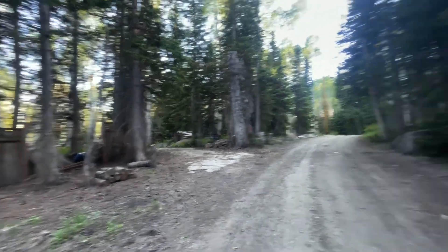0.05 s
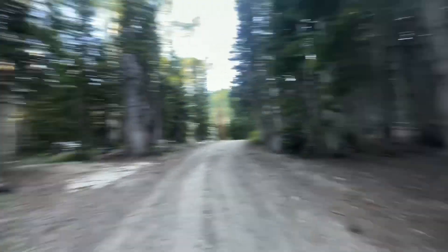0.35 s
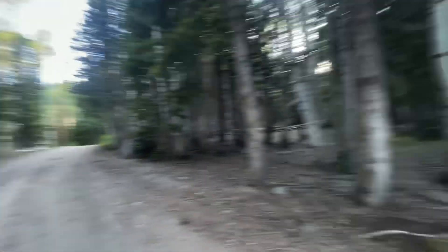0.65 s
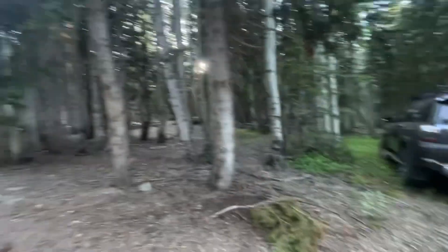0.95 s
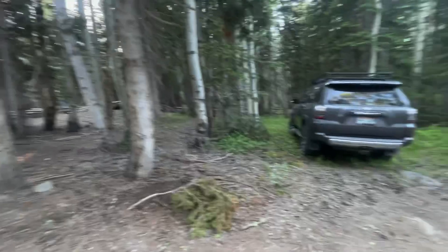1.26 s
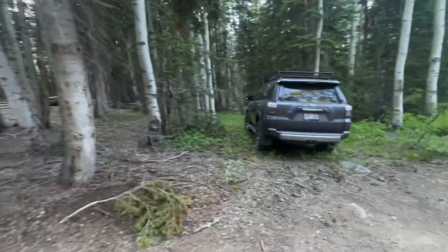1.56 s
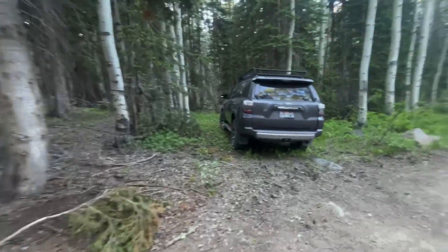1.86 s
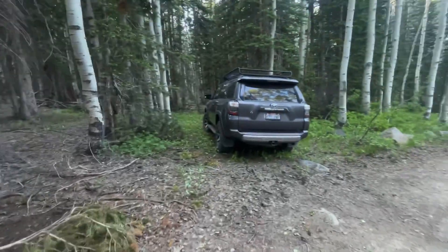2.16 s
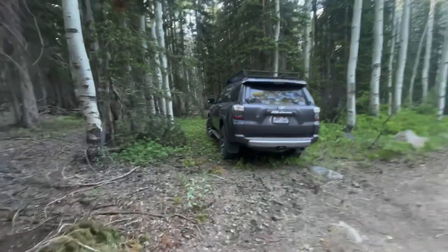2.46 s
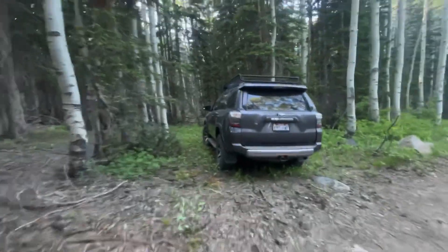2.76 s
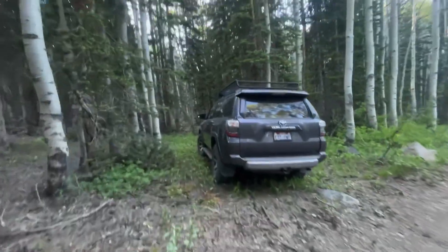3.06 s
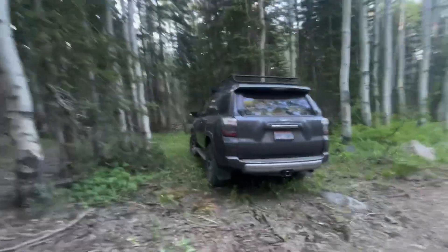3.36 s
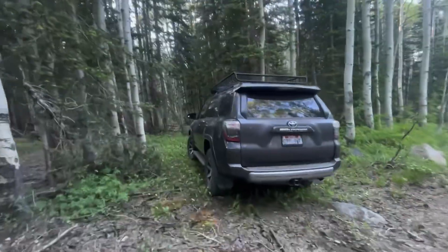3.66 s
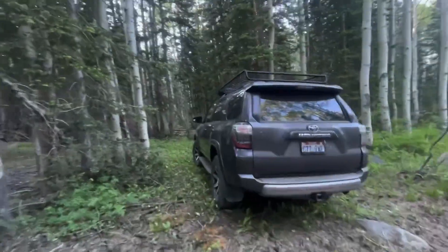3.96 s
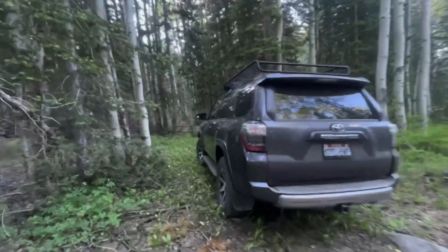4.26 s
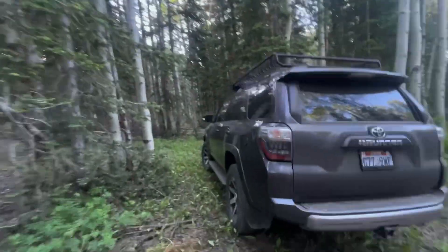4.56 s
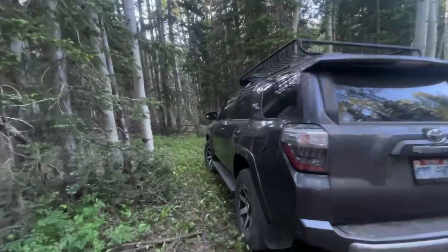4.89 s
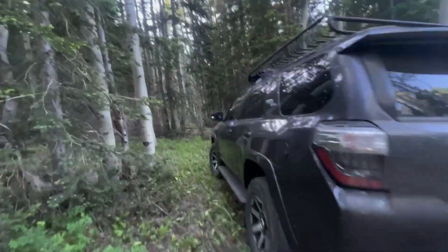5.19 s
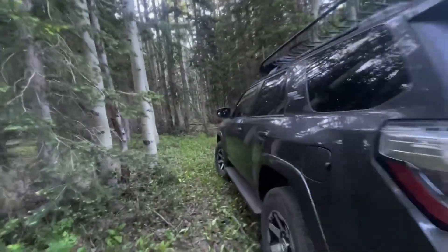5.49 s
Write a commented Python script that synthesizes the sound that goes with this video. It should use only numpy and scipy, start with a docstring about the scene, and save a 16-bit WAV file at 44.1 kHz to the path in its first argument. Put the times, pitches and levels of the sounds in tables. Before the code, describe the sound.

In a quiet forest, a person walks from a dirt road onto dry litter, heard close from a hand-held microphone that gets bumped a few times near the start. Each step brings a soft, gritty crunch with clicking stones and the odd breaking twig. A trouser leg swishes lightly and a far bird whistles very faintly. Toward the end the feet brush through undergrowth, and sharp snaps and crackling leaves crowd together.

```python
"""A still woodland, on a walk from a dirt road over forest litter into dry undergrowth, heard from the
two microphones of a small hand-held camera. The air rumbles low and a far bird whistles faintly.
Close by, each step grinds soil, twigs and dead leaves as a swarm of tiny fractures; pebbles clack,
twigs snap, heels thud and a trouser leg swishes. Right at the microphones the hand bumps the camera,
several times early on and once near the end."""
import sys
import numpy as np
from scipy import signal
from scipy.io import wavfile

SR = 44100
rng = np.random.default_rng(int(sys.argv[2]) if len(sys.argv) > 2 else 0)


def dump_mix(stems):
    """Bounce the given channels to the path in sys.argv[1] as a 16-bit WAV at rate SR."""
    frames = np.atleast_2d(stems).T  # one column per channel
    limited = np.clip(frames, -1, 1)  # hard clip at full scale
    pcm = np.round(limited * 32767).astype(np.int16)
    wavfile.write(sys.argv[1], SR, pcm)


N = 243873
TIME = np.arange(N) / SR

# How alike the two microphones hear noise. Each row: frequency in Hz, left-right correlation.
MIC_CORRELATION = [(60, 0.22), (300, 0.46), (900, 0.75), (1800, 0.24), (3000, 0.22), (7000, 0.24)]
# Lean between the microphones, for noise and for snaps. Each row: frequency in Hz, left over right in dB.
MIC_BALANCE = [(700, 0.5), (2500, -.5), (4500, 1.5), (7000, 5.5), (9000, 10), (11000, -0.5)]
SNAP_BALANCE = [(3000, 1), (6200, 2), (7300, 3), (8400, 12), (10300, 4)]
# Colours of the air all around and of the ground below the camera.
# Each row: frequency in Hz, relative spectral density in dB.
AIR_COLOUR = [(25, -19), (45, -0.5), (65, 9), (100, -5), (200, -35), (400, -16), (1000, -35)]
EARTH_COLOUR = [(75, -3.5), (250, -1.5), (520, -1)]
HUMUS_COLOUR = [(360, -20), (580, 1), (900, -1)]
SOIL_COLOUR = [(240, -17), (380, -17.5), (550, -1.5), (850, 3), (1300, 2.5), (1900, -12.5), (2600, -19)]
TWIG_COLOUR = [(1400, -2), (2100, -4), (2900, -1), (3700, -3.5), (4600, -7.5), (6000, -14)]
LEAF_COLOUR = [(3800, -12), (5000, -8), (6300, -2.5), (8000, -2.5), (9800, -3), (11500, -1.5), (12800, -9),
               (14500, -28)]
# The low rumble of the air. Each row: time in seconds, level in dB.
AIR_LEVELS = [(1, -72.5), (1.3, -76), (2.1, -80), (2.4, -76), (3.6, -74.5)]
# A bird far off in the trees. Each row: middle in seconds, length in seconds, pitch in Hz, level in dB.
BIRD_WHISTLES = [(2.496, 0.12, 5400, -62.5), (3.678, 0.35, 4100, -68.5)]
# A trouser leg passing close by. Each row: middle in seconds, length in seconds, level in dB.
SWISHES = [(1.389, 0.44, -70)]
# The cloth's hollow colour. Each row: centre in Hz, width in Hz, gain in dB.
SWISH_MODES = [(3220, 510, -3.5), (5900, 520, -0.5), (8300, 730, -6)]
# The camera case ringing. Each row: pitch in Hz, level in dB, left over right in dB.
CASE_MODES = [(1980, -39.5, -4), (3660, -54.5, -4), (6500, -42.5, -1), (8750, -30.5, -21)]
# The hand bumping the camera. Each row: time in seconds, level in dB, pitch in Hz,
# left over right in dB, fall of pitch per cycle, cycles to the peak.
HAND_BUMPS = [(0.674, -26, 810, 3.5, 0.2, 1.23), (0.7082, -31, 564, 5, .03, 1.4),
              (0.7475, -20, 676, 1.5, .38, 1.17), (.773, -24.5, 512, 9, 0.8, 1.28),
              (0.8131, -25.5, 704, 8, .21, 1.32), (4.8908, -26, 887, 11, 0.016, 2.25)]
# Weight landing on soft ground. Each row: time in seconds, level in dB, pitch in Hz.
HEEL_THUDS = [(1.567, -46.5, 208), (1.593, -49, 68.4), (1.807, -56.5, 187), (2.012, -57.5, 84.5),
              (2.612, -46.5, 266), (3.202, -47, 230)]
# Pebbles knocked together underfoot. Each row: time in seconds, level in dB, pitch in Hz.
PEBBLE_CLACKS = [(.0282, -44, 850), (.065, -42, 990), (0.0817, -46, 1030), (0.3994, -43.5, 1150),
                 (.412, -44, 1100), (0.4684, -43.5, 860), (0.9667, -42, 1050), (.9798, -39.5, 1120),
                 (1.0273, -39.5, 1150), (1.1354, -48, 1480), (1.2478, -44, 1250), (1.397, -46.5, 1120),
                 (1.558, -30.5, 895), (1.7856, -36, 1080), (1.7957, -35.5, 1330), (1.84, -38, 1280),
                 (1.8835, -42, 960), (1.9025, -36, 1510), (1.941, -48.5, 1500), (2.0532, -48, 900),
                 (2.1083, -49, 920), (2.1606, -52.5, 1030), (2.5166, -41.5, 1120), (2.535, -36.5, 1020),
                 (2.5435, -41, 920), (2.5577, -39.5, 1200), (2.777, -50.5, 860), (2.8525, -45, 1000),
                 (2.876, -43.5, 853), (2.9335, -44, 800), (3.1796, -47.5, 1300), (3.2036, -40, 980),
                 (3.2408, -39, 950), (3.2504, -41.5, 1250), (3.524, -40.5, 960), (3.7258, -47.5, 1410),
                 (3.791, -47.5, 1400), (3.8256, -44.5, 770), (3.944, -43, 686), (4.1629, -43, 740),
                 (4.224, -45.5, 881), (4.7933, -38.5, 1520), (5.2339, -31.5, 970), (5.462, -41, 1520)]
# Twigs snapping. Each row: time in seconds, level in dB, pitch in Hz, share of clean ring from 0 to 1.
TWIG_SNAPS = [(.3988, -47, 8550, .94), (0.6732, -45.5, 2400, 0.7), (0.937, -41, 7500, 0.6),
              (1.2258, -48, 2810, 0.1), (1.559, -34, 7900, 0.5), (1.583, -46, 3350, 0.7),
              (1.5924, -46.5, 2730, 0.7), (1.775, -40.5, 2800, 0.3), (1.796, -34.5, 2630, 0.53),
              (1.802, -37.5, 2720, 0.6), (1.9973, -34.5, 8200, 0.62), (2.35, -52, 2800, 0.56),
              (2.5858, -39.5, 2940, 0.36), (2.6394, -25, 8440, 0.94), (3.16, -45, 3080, 0),
              (3.1794, -35.5, 3830, .75), (3.196, -35, 5700, 0.06), (3.8189, -36, 7500, 0.13),
              (3.858, -46, 3160, 0), (4.176, -42, 6000, 0.2), (4.271, -36.5, 6500, 0.02),
              (4.3256, -33, 9000, .6), (4.3431, -36.5, 7200, 0.1), (4.3685, -36, 7400, 0),
              (4.452, -32.5, 6350, 0.46), (4.4721, -25, 6500, 0.65), (4.6976, -33, 6350, 0.26),
              (4.723, -31, 6900, 0.53), (4.757, -33.5, 8300, 0.7), (4.7931, -27.5, 3270, 0.44),
              (4.8007, -28, 8450, 0.44), (4.838, -34, 8800, .2), (4.8555, -26, 8600, 0.62),
              (4.944, -35, 3770, 0.2), (4.9991, -22, 8560, 0.7), (5.0137, -19, 8100, 0.74),
              (5.0253, -29.5, 7300, 0.4), (5.068, -21.5, 8300, 0.64), (5.118, -20.5, 6250, 0.3),
              (5.178, -28, 3300, 0.1), (5.2337, -19, 6000, .85), (5.2555, -22.5, 6170, 0.73),
              (5.3537, -30, 6170, 0.62)]
# The ring of a snap. Each row: multiple of the snap's pitch, gain in dB.
SNAP_MODES = [(.8, -16), (1, 1.5), (1.2, -20)]
# The path gives way to undergrowth on deep humus. Each row: time in seconds, its share from 0 to 1.
UNDERGROWTH = [(4.24, 0.07), (4.28, 0.68), (4.5, 0.39)]
# A faint rustle that never stops. Each row: time in seconds, then soil, twig and leaf drive in dB.
RUSTLE = [(0, -62.5, -70, -76), (.63, -74.5, -72, -72.5), (1.52, -69, -64.5, -64), (2.18, -71, -70, -69),
          (2.97, -68.5, -65, -66), (3.66, -69, -69, -66), (5.52, -65.5, -57.5, -55.5)]
# The swinging foot brushing through the litter.
# Each row: middle in seconds, half length in seconds, drive in dB, leaves over soil in dB.
BRUSHES = [(1.355, 0.14, -66.0, -4), (1.976, 0.048, -67, 9), (2.526, 0.21, -65, 2.5),
           (2.88, 0.069, -63.5, -2), (3.518, 0.093, -68, -10), (3.76, 0.068, -65, 3),
           (3.974, 0.15, -55.5, -4.5), (4.047, 0.039, -58.5, -0.5), (4.382, 0.058, -58.5, 4.5),
           (4.476, 0.035, -50, 1), (4.588, 0.051, -50.5, -4), (4.908, 0.22, -53, 1.5),
           (5.328, 0.068, -56.5, 12), (5.487, 0.0343, -57.5, 10)]
# A shoe pressing on the ground. Each row: end of the attack in seconds, hold in seconds,
# release to -60 dB in seconds, then soil, twig and leaf drive in dB.
STEPS = [(0.077, 0.038, 0.34, -53, -67.5, -72), (0.205, 0.012, 0.09, -53.0, -72, -77),
         (0.284, 0.21, 0.3, -59.5, -67, -73.5), (0.391, 0.013, 0.25, -56.0, -62, -64),
         (0.669, 0.15, 0.72, -59.5, -75, -66.5), (0.938, 0.057, 0.46, -56, -68, -68.5),
         (1.557, 0.028, 0.04, -50.5, -62, -57), (1.785, 0.012, 0.76, -51, -58, -62),
         (1.823, 0.061, 0.62, -50, -55, -60.5), (2.546, 0.06, 0.55, -52, -56.5, -57.5),
         (2.918, 0.013, 0.16, -50.5, -54.5, -59), (3.159, 0.06, 0.85, -51, -57.5, -55),
         (3.308, 0.036, 0.3, -58.5, -64.5, -64.0), (4.199, 0.011, 0.24, -53.5, -58, -61),
         (4.492, 0.032, 0.26, -52, -42, -37.5), (4.701, 0.015, 0.5, -51, -64, -51),
         (5.114, 0.03, 0.66, -39, -37.5, -36), (5.199, 0.051, 0.33, -45, -41.5, -36.5)]

CASE_CLICK_S, CASE_RISE_CYCLES = .7453, 3.1
SNAP_RISE_S, SPLINTER_S = .0007, .0034   # a snap swells to its peak, then the fibres tear on
STEM_RING_CYCLES, STEM_RANGE_HZ = 5.6, (2470, 11230)
STEP_ATTACK_S, SAG_DB_PER_S = .027, 10   # the crunch eases while the weight settles
LEFT_LAG_S = .00004   # the steps reach the right microphone a little sooner


def from_db(db):
    """Decibels to gain."""
    return 10 ** (np.asarray(db) / 20)


def rms_one(x):
    """Scale to unit rms."""
    return x / np.sqrt(np.mean(x ** 2) + 1e-20)


def in_time(rows):
    """Columns of a curve table at every sample."""
    s, *columns = np.transpose(rows)
    return [np.interp(TIME, s, c) for c in columns]


def at_hz(points, hz):
    """Read a table on a log-frequency axis."""
    f, value = np.transpose(points)
    return np.interp(np.log(hz), np.log(f), value)


def band(x, low_hz, high_hz, order=2):
    """Butterworth band-pass."""
    sos = signal.butter(order, [low_hz, min(high_hz, .48 * SR)], "band", fs=SR, output="sos")
    return signal.sosfilt(sos, x + 1e-18)


def below(x, hz):
    """Steep low-pass without delay."""
    return signal.sosfiltfilt(signal.butter(10, hz, fs=SR, output="sos"), x)


def panned(db):
    """Constant-power gains for the two microphones, the left louder by db."""
    return rms_one(from_db([[db / 2], [-db / 2]]))


def add(out, s, sound):
    """Mix a stereo sound in from time s."""
    i = max(0, round(s * SR))
    out[:, i:i + sound.shape[1]] += sound[:, :N - i]


def coloured(colour, drive):
    """Third-octave bands of stereo noise, gated by one drive, each flickering a little; rms 1."""
    edges = 1000 * 2 ** (np.arange(-16, 14) / 3)
    flicker_times = np.arange(0, N / SR, .018)
    white, out = rng.standard_normal((2, 2, N)) * drive, 0
    for k, (low, high) in enumerate(zip(edges, edges[1:])):
        hz = np.sqrt(low * high)
        if colour[0][0] < hz < colour[-1][0]:
            mid, side = band(white[k % 2], low, high)
            alike = at_hz(MIC_CORRELATION, hz)
            pair = np.sqrt(1 + alike) * mid + np.sqrt(1 - alike) * side * [[1], [-1]]
            flicker_db = rng.normal(0, 2.28, len(flicker_times))
            gain = np.interp(TIME, flicker_times, from_db(at_hz(colour, hz) + flicker_db))
            out = out + pair * gain * panned(at_hz(MIC_BALANCE, hz))
    return rms_one(out)


def swell(cycles, rise):
    """Envelope that peaks at 1 after `rise` cycles and dies nearly as fast."""
    return (cycles / rise * np.exp(1 - cycles / rise)) ** 3


def knock(hz, fall, rise, lag, tail_db):
    """A damped ring sinking in pitch, then a scattered tail; lag in radians between the microphones."""
    cycles = TIME[:int(30 * SR / hz)] * hz
    phase = 2 * np.pi * (1 + fall * rise) * np.log1p(fall * cycles) / fall + rng.uniform(0, 2 * np.pi)
    ring = swell(cycles, rise) * np.sin(phase + [[0], [lag]])
    scatter = rms_one(band(rng.standard_normal(SR // 2)[:len(cycles)], hz / 2, hz * 1.1))
    return ring + from_db(tail_db) * scatter * (1 - np.exp(-cycles / rise)) * np.exp(-cycles / 8)


def air():
    """The woodland air rumbles low all around the microphones."""
    return from_db(in_time(AIR_LEVELS)[0]) * coloured(AIR_COLOUR, 1)


def far_bird():
    """Thin, distant whistles, smeared by the trees into narrow bands of noise."""
    out = np.zeros((2, N))
    for s, length, hz, db in BIRD_WHISTLES:
        whistle = rms_one(band(rng.standard_normal((2, SR)), hz * .95, hz * 1.05))
        shape = np.hanning(int(length * SR))
        add(out, s - length / 2, from_db(db) * whistle[:, :len(shape)] * shape)
    return out


def trouser_swish():
    """Just below the camera, cloth rubs softly through three hollow resonances."""
    out = np.zeros((2, N))
    for s, length, db in SWISHES:
        shape = np.hanning(int(length * SR))
        for hz, width, mode_db in SWISH_MODES:
            noise = rng.standard_normal((2, SR))
            mid, side = band(noise, hz - width / 2, hz + width / 2)[:, :len(shape)]
            cloth = panned(at_hz(MIC_BALANCE, hz)) * rms_one(mid + side * [[.5], [-.5]])
            add(out, s - length / 2, from_db(db + mode_db) * cloth * shape)
    return out


def case_click():
    """At the hardest bump the camera case ticks in four short modes, right at the microphones."""
    out, t = np.zeros((2, N)), TIME[:SR // 25]
    for hz, db, pan_db in CASE_MODES:
        ring = swell(t * hz, CASE_RISE_CYCLES) * np.sin(2 * np.pi * hz * t)
        add(out, CASE_CLICK_S - CASE_RISE_CYCLES / hz, from_db(db) * panned(pan_db) * ring)
    return out


def hand_bumps():
    """Knocks through the camera body rock its two microphones nearly in opposition."""
    out = np.zeros((2, N))
    for s, db, hz, pan_db, fall, rise in HAND_BUMPS:
        gain = from_db(db) * panned(pan_db)
        add(out, s - rise / hz, gain * knock(hz, fall, rise, lag=2.36, tail_db=-20))
        grip = fall * gain   # the grip swings on, lower and later
        add(out, s, grip * from_db(-2.5) * knock(266, fall=.33, rise=.94, lag=2.47, tail_db=-29))
        add(out, s, grip * from_db(-11.5) * knock(78, fall=.095, rise=.71, lag=2, tail_db=-18))
    return out


def heel_thuds(rise=1.7):
    """The springy forest floor gives a few low cycles under a heel."""
    out = np.zeros((2, N))
    for s, db, hz in HEEL_THUDS:
        add(out, s - rise / hz, from_db(db) * knock(hz, fall=.025, rise=rise, lag=.67, tail_db=-13.5))
    return out


def pebbles(rise=1.188):
    """Stones bedded in earth ring for only two or three cycles, with a gritty tick at the contact."""
    out = np.zeros((2, N))
    for s, db, hz in PEBBLE_CLACKS:
        clack = knock(hz, fall=.13, rise=rise, lag=0, tail_db=-13)
        grit = rms_one(band(rng.standard_normal(SR // 10), 1400, 3100))[:clack.shape[1]]
        tick = grit * swell(TIME[:len(grit)] * hz, rise)
        add(out, s - rise / hz, from_db(db) * (clack + from_db(-17.5) * tick))
    return out


def twig_snaps():
    """A thin twig parts with a brief ring of three modes, a rotten one with a broad, splintering crack."""
    out, t = np.zeros((2, N)), TIME[:SR // 25]
    splintering = np.exp(-t / SPLINTER_S) * np.minimum(t / SNAP_RISE_S, 1)
    for s, db, hz, clean in TWIG_SNAPS:
        rise = max(SNAP_RISE_S * hz, 3.2)   # cycles
        burst, ring = swell(t * hz, rise), 0
        for ratio, mode_db in SNAP_MODES:
            gain = from_db(mode_db + rng.normal(0, 1)) * panned(at_hz(SNAP_BALANCE, hz * ratio))
            phase = 2 * np.pi * (hz * ratio * t + rng.random()) + rng.uniform(0, 1, (2, 1))
            ring = ring + gain * burst * np.sin(phase)
        # standing stems crack brighter than trodden twigs
        top_hz = 9000 + 3000 * np.interp(s, *np.transpose(UNDERGROWTH))
        mid, side = band(rng.standard_normal((2, len(t))), hz * .37, min(hz * 1.5, top_hz), order=4)
        noise = panned(at_hz(SNAP_BALANCE, hz)) * rms_one(mid + side * [[.5], [-.5]])
        crack = from_db(-2) * noise * (burst + splintering) / 2
        add(out, s - rise / hz, from_db(db) * (clean * ring + (1 - clean) * crack))
    return out


def stems(per_s):
    """Dry stems of many thicknesses break, each ringing briefly at its own pitch and place; rms 1."""
    pitches = np.geomspace(*STEM_RANGE_HZ, 32)
    per_s = np.maximum(per_s, 100)
    cracks = rng.standard_normal(N) * (rng.random(N) < per_s / SR) / np.sqrt(per_s)
    crack_hz, out = rng.choice(pitches, N), 0
    for hz in pitches:
        radius, angle = np.exp(-hz / (STEM_RING_CYCLES * SR)), 2 * np.pi * hz / SR
        resonator = [1, -2 * radius * np.cos(angle), radius ** 2]
        ring = signal.lfilter([np.sin(angle)], resonator, cracks * (crack_hz == hz) + 1e-18)
        place = panned(at_hz(MIC_BALANCE, hz) + rng.normal(0, 3.7))
        out = out + from_db(at_hz(LEAF_COLOUR, hz)) * place * ring
    return rms_one(out)


def fractures(colour, per_s, spread_db, rub, clump_db):
    """Clumps of cracks, many small and few large; rub is the ratio of rubbing to cracking; rms 1."""
    sizes = from_db(spread_db * np.minimum(rng.exponential(1, N), 3))
    clumps = from_db(clump_db * np.tanh(rms_one(band(rng.standard_normal(N), 12, 107))))
    cracks = rms_one(sizes * clumps * (rng.random(N) < per_s / SR))
    return coloured(colour, np.sqrt((cracks ** 2 + rub ** 2) / (1 + rub ** 2)))


def tread():
    """Feet press and brush: soil, twig and leaf drive in dB, then the brushes' share of soil power."""
    clock = np.linspace(0, N / SR, N // 64)
    power = from_db([np.interp(clock, TIME, db) for db in in_time(RUSTLE)]) ** 2
    for s, hold, release, *levels in STEPS:
        t = clock - s
        attack = np.clip(1 + t / STEP_ATTACK_S, 0, 1) ** 2
        sag_db = SAG_DB_PER_S * (np.clip(t, 0, hold) - hold / 2)
        release_db = 60 * np.clip((t - hold) / release, 0, 2)
        power = power + np.outer(from_db(levels), attack * from_db(-sag_db - release_db)) ** 2
    pressing = power[0]
    for s, half, db, leafy_db in BRUSHES:
        levels = [db - leafy_db / 2, db - .7, db + leafy_db / 2]   # twigs bend more than they break
        sweep = np.exp(-.5 * ((clock - s) / half) ** 4)
        power = power + np.outer(from_db(levels), sweep) ** 2
    return in_time(np.column_stack([clock, *10 * np.log10(power), 1 - pressing / power[0]]))


def crunch():
    """Underfoot, soil grinds low, twigs crackle in the middle, dry leaves fizz and stems ping on top."""
    soil_db, twig_db, leaf_db, dragging = tread()
    lush = in_time(UNDERGROWTH)[0]
    # a light or dragging foot only rubs, a heavy one breaks things
    slide = np.clip(from_db(-(soil_db + 61)), .25, 2) + dragging + .5 * lush
    soil = fractures(SOIL_COLOUR, per_s=300, spread_db=2.5, rub=slide, clump_db=2.5)
    humus = fractures(HUMUS_COLOUR, per_s=360, spread_db=1, rub=1, clump_db=-1.5)
    earth = coloured(EARTH_COLOUR, 1)
    twigs = fractures(TWIG_COLOUR, per_s=800, spread_db=3, rub=slide + .9, clump_db=5.5)
    leaves = fractures(LEAF_COLOUR, per_s=1400, spread_db=1.5, rub=1.4 - lush, clump_db=4)
    # a heavy foot breaks stems in a dense rush, a light one singly
    crackle = stems(per_s=390 * from_db(1.3 * (leaf_db + 45.5)))
    litter = (soil * from_db(soil_db - 4.5) * (1 - .46 * lush)
              + humus * from_db(soil_db - 1.7) * lush
              + earth * from_db(.62 * soil_db - 34.5 + 3 * dragging)   # it yields, so its hush grows slowly
              + twigs * from_db(twig_db - 3)
              + leaves * from_db(leaf_db + .48 + 1.7 * lush)
              + crackle * from_db(leaf_db + 1.5) * lush)
    dull = below(litter, 9320)   # the crunch is muffled above about 9 kHz, brighter in the undergrowth
    return dull + .73 * lush * (litter - dull)


def scene():
    """From the camera: the ground close below, the hand on the case and the woodland around."""
    left, right = crunch() + twig_snaps() + pebbles()
    allpass = (1 - LEFT_LAG_S * SR) / (1 + LEFT_LAG_S * SR)
    late = signal.lfilter([allpass, 1], [1, allpass], left)
    # the highest treble has no left-right delay
    ground = np.stack([left + below(late - left, 10830), right])
    return ground + trouser_swish() + heel_thuds() + hand_bumps() + case_click() + air() + far_bird()


def record(dry):
    """The camera's microphones lose the deepest bass and roll off in the top octave."""
    heard = signal.sosfilt(signal.butter(2, 30, "high", fs=SR, output="sos"), dry)
    heard = signal.sosfilt(signal.butter(10, 12700, fs=SR, output="sos"), heard)
    return signal.sosfilt(signal.cheby2(12, 70, 15900, fs=SR, output="sos"), heard)


dry = scene()
out = record(dry)
dump_mix(out)
```